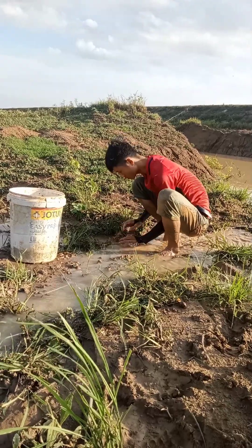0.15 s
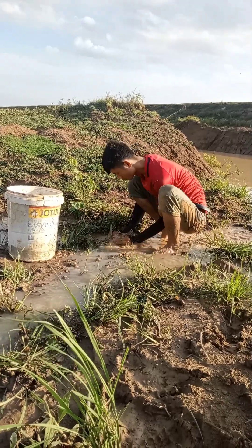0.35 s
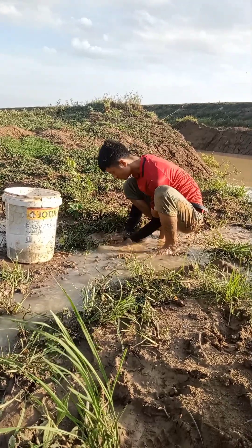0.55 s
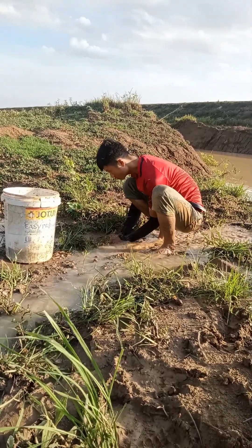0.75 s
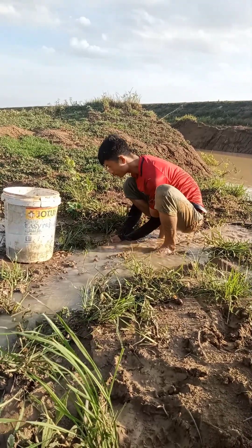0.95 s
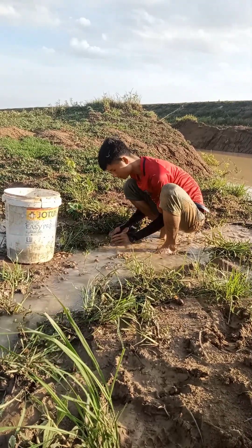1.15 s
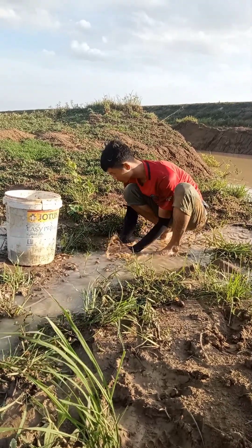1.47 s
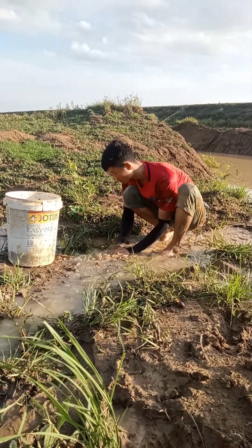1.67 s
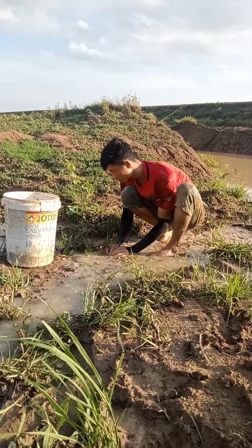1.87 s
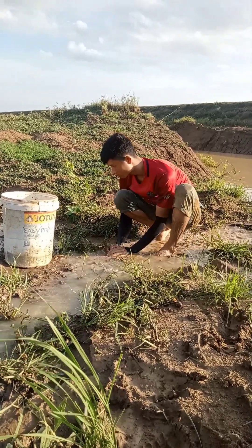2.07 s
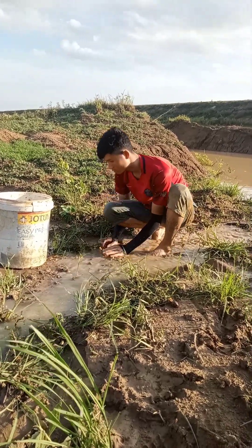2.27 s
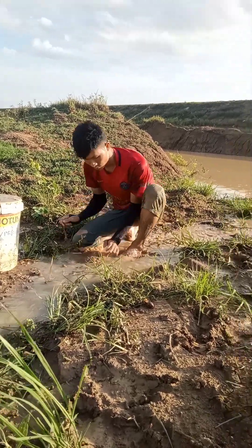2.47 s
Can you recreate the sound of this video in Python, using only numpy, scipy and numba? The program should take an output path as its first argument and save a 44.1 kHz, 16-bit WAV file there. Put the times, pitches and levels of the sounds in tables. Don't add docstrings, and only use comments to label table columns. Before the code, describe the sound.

Hands slosh through a shallow muddy puddle outdoors while wind buffets and thumps the microphone

```python
import sys
import numpy as np
from scipy import signal
from scipy.fft import rfft, irfft
from scipy.io import wavfile
from scipy.ndimage import uniform_filter1d
from numba import njit

SR = 44100
rng = np.random.default_rng(int(sys.argv[2]) if len(sys.argv) > 2 else 0)


def volts(x):
    e = np.asarray(x, float) / 20
    return 10 ** e


def file_out(sig):
    cols = np.atleast_2d(sig).T
    lim = np.clip(cols, -1, 1)
    pcm = np.round(lim * 32767).astype(np.int16)
    wavfile.write(sys.argv[1], SR, pcm)


N = 114660

# time_s, level_db
STIR = [(0, -42), (.15, -41), (.22, -44), (.42, -40.5), (.65, -42), (.92, -40), (1.0, -44), (1.2, -42),
        (1.38, -42), (1.47, -41), (1.75, -43), (2.08, -46), (2.3, -49.5), (2.43, -44.5), (2.52, -38.5),
        (2.6, -41.5)]
# pitch_hz, level_db (per Hz)
WATER = [(250, -2.5), (600, -9.5), (1300, -15.5), (1900, -8.5), (3100, -4), (3900, -8), (4800, -23),
         (6500, -23)]
# pitch_hz, level_db (per Hz)
PORT_SHOULDER = (10700, -23)
# time_s, level_db
BREEZE = [(0, -64), (.17, -50.5), (.21, -31.5), (.36, -40.5), (.44, -33.5), (.47, -48), (.51, -31),
          (1.0, -28), (1.4, -25), (1.8, -25.5), (2.12, -24), (2.2, -31), (2.235, -43), (2.27, -37.5),
          (2.4, -45.5), (2.52, -51), (2.6, -56)]
# start_s, peak_db, pitch_hz, t60_s (time to fade by 60 dB)
GULPS = [(.063, -43.5, 790, 0.022), (0.223, -50, 1043, 0.073), (1.081, -38.5, 494, 0.03),
         (1.375, -42, 527, 0.035), (1.484, -54, 850, 0.096), (1.647, -43, 485, 0.16),
         (1.963, -55, 1040, 0.034), (2.17, -63, 1010, 0.05), (2.498, -45.5, 1050, 0.02),
         (2.519, -63, 620, 0.032), (2.564, -40.5, 836, 0.022), (2.571, -42, 550, 0.018)]
# start_s, peak_db, pitch_hz
TICKS = [(0.2563, -42, 9300), (0.3568, -26.5, 4940), (0.7376, -35, 9250), (0.796, -39, 9500),
         (0.843, -35, 14000), (0.9433, -36, 9400), (1.22, -35.5, 9000), (1.4449, -16.5, 6330),
         (1.508, -35.5, 11400), (1.5745, -31.5, 5300), (1.634, -35, 6500), (1.68, -40, 5060),
         (2.4645, -34, 9100), (0.528, -34, 6430), (1.341, -41, 8050), (2.452, -41, 7000),
         (2.498, -28, 5200), (2.584, -30, 4600),
         (0.0957, -40, 9300), (0.18, -44, 9500), (0.41, -39, 9170), (0.4738, -44, 8170),
               (0.596, -41, 10400), (0.6454, -52, 11000), (0.7592, -44, 9500), (0.8814, -40.5, 9400),
               (0.9204, -46, 5700), (1.033, -41, 7300), (1.0874, -39, 9200), (1.1154, -40, 9450),
               (1.3574, -47, 5500), (1.5953, -45, 9500), (1.6885, -37, 9100), (1.728, -49, 5540),
               (1.7395, -44, 7460), (1.8575, -40, 8630), (1.9694, -42, 6960), (2.0763, -46, 9240),
               (2.113, -45, 6580), (2.169, -43, 7450), (2.2646, -44, 9560), (2.2972, -43, 9200),
               (2.355, -48, 10300)]
# start_s, peak_db, pitch_hz
DROPS = [(0.1428, -28, 2900), (0.3344, -26, 2830), (0.3486, -26.5, 1520), (0.354, -5, 2970),
         (0.416, -36, 3140), (0.4404, -27.5, 1600), (0.5568, -25, 2960), (0.8098, -32.5, 2860),
         (0.9192, -23, 2790), (1.1156, -32, 3430), (1.2107, -31, 3130), (1.4235, -33, 3000),
         (1.4404, -22.5, 2940), (1.4436, -22, 4960), (1.4441, -24.5, 4230), (1.4452, -26.5, 3300),
         (1.4625, -26.5, 2150), (1.472, -36, 3340), (1.478, -34.5, 4200), (1.4614, -41, 3200),
         (1.4984, -35.5, 2870), (1.7823, -32, 2760), (2.2157, -36.5, 2990), (2.4031, -35, 1870),
         (2.4515, -35, 1848), (2.509, -21.5, 2290), (2.5154, -28, 2140), (2.5447, -29, 2460),
         (2.563, -28.5, 2900), (2.581, -25.5, 2080)]
# centre_s, peak_db, pitch_hz
EDDIES = [(0.405, -13, 208), (0.536, -12.5, 149.5), (0.63, -13, 166), (0.696, -8.5, 170.4),
          (0.763, -17, 138), (0.878, -19, 135), (0.9, -10, 136), (0.992, -21, 106),
          (1.072, -26, 160), (1.131, -9, 217), (1.169, -12, 147), (1.227, -9.5, 192),
          (1.353, -17, 152), (1.395, -14, 128), (1.469, -27, 139), (1.506, -16.5, 180),
          (1.558, -12, 173), (1.68, -14, 173), (1.713, -7, 214), (1.728, -7.5, 185),
          (1.778, -14.5, 256), (1.834, -12.5, 148), (1.85, -7.5, 181), (1.913, -12, 182),
          (1.954, -10.5, 173), (2.015, -11, 241), (2.048, -6.5, 210), (2.073, -4, 208),
          (2.09, -8.5, 188), (2.112, -13, 276),
          (0.206, -17.5, 146), (0.232, -20, 135), (0.311, -22, 140), (0.423, -25.5, 168),
                (0.548, -15, 238), (0.567, -19.5, 134), (0.715, -13, 193.0), (0.783, -20.5, 119),
                (0.845, -16, 212), (0.926, -43, 133.0), (0.938, -31, 122.0), (1.057, -16, 130.5),
                (1.106, -28, 120), (1.195, -18, 147), (1.263, -40, 161.0), (1.316, -25, 165),
                (1.384, -16, 147), (1.418, -23, 131), (1.442, -35, 130.0), (1.535, -17.5, 150),
                (1.598, -44, 147), (1.635, -16.5, 187), (1.761, -15.5, 196), (1.799, -18, 160.0),
                (1.814, -25, 143.0), (1.872, -14, 135), (1.887, -13.5, 199), (1.989, -27, 131),
                (2.171, -21.5, 233), (2.271, -25.5, 189),
          (2.039, -10, 320), (2.025, -12.5, 313), (2.065, -14.5, 360), (2.069, -18, 460),
                (2.12, -17, 252), (2.135, -20, 268), (2.19, -36, 170), (2.201, -26, 276),
                (2.215, -29.5, 200), (2.253, -27, 211), (2.354, -32, 188), (2.459, -27.5, 122),
                (0.494, -24, 118), (.52, -22.5, 147), (0.575, -25.5, 266), (0.689, -15.5, 198),
                (0.727, -19.5, 247), (.794, -21.5, 201), (.864, -17, 303), (1.068, -21, 352),
                (1.156, -15.5, 290), (1.245, -14, 158), (1.342, -21.5, 306), (1.566, -18, 298),
                (1.843, -17.5, 241), (2.043, -23.5, 640), (2.071, -19.5, 720), (2.016, -27, 560),
                (1.726, -20.5, 520)]
# centre_s, level_db, half_length_s, brightness_db (per octave)
SLAPS = [
    (0.266, -42.5, 0.014, 1),
    (0.351, -33, .012, -0.5),
    (.358, -29, 0.0039, 2.5),
    (0.84, -38, 0.0008, 13),
    (1.442, -35.5, 0.0071, 3),
    (1.446, -37, 0.0011, 8.5),
    (1.46, -40, 0.02, 1),
    (2.515, -43, 0.022, 4.5),
    (2.57, -35, 0.0023, -2),
    (2.59, -47, 0.016, 2),
]

PORT_HZ, PORT_OCTAVES, PORT_DB = 9380, .1, 4.5
HISS_DB, FIZZ_DB, BUBBLE_DB, CRACKLE_DB = -8.5, -3.5, -9.5, -19
BREEZE_LOW_HZ, BREEZE_TOP_HZ = 66.5, 218.4
TICK_T60_S, SPRAY_S, SPRAY_DB = .005, .0018, -7
DROP_T60_S, DROP_RISE = .011, .03
EDDY_TURNS, EDDY_BEND = .59, .087
SWIRL_TOP, SWIRL_FLOOR, SWIRL_DB = 1.984, 1.43, -11.5


def curve(table):
    time_s, value = np.array(table, float).T
    return np.interp(np.arange(N) / SR, time_s, value)


def columns(table):
    return np.array(table, float).T.copy()


def unit(x):
    return x / np.sqrt(np.mean(x ** 2))


def drift(rate):
    hold = int(SR / rate)
    steps = np.repeat(rng.standard_normal(N // hold + 1), hold)
    return 1.9 * uniform_filter1d(uniform_filter1d(steps, hold), hold)[:N]


def water_db(hz):
    point_hz, point_db = np.vstack([WATER, PORT_SHOULDER]).astype(float).T
    port_db = PORT_DB * np.exp(-.5 * (np.log2(hz / PORT_HZ) / PORT_OCTAVES) ** 2)
    top_db = -19 * np.clip(np.log2(hz / point_hz[-1]), 0, .42)
    return np.interp(np.log2(hz), np.log2(point_hz), point_db) + port_db + top_db


def coloured(tilt_db, x=None):
    hz = np.maximum(np.arange(N // 2 + 1) * SR / N, 30)
    x = rng.standard_normal(N) if x is None else x
    return unit(irfft(rfft(x) * volts(water_db(hz) + tilt_db * np.log2(hz / 3000)), N))


@njit
def rings(start, size, hz, t60, rise, attack):
    y = np.zeros(N)
    for e in range(len(start)):
        length, first, phase = t60[e] * SR, int(start[e] * SR), 0.
        for i in range(max(0, min(int(length), N - first))):
            phase += 2 * np.pi * hz[e] * (1 + rise * 2 * i / length) / SR
            swell = 1 - np.exp(-i * hz[e] / SR / attack)
            y[first + i] += size[e] * 1000. ** (-i / length) * swell * np.sin(phase)
    return y


@njit
def moving_filter(x, hz, k):
    y, b, l = np.empty((3, len(x))), 0., 0.
    for i in range(len(x)):
        g = np.tan(np.pi * hz[i] / SR)
        v = (b + g * (x[i] - l)) / (1 + g * (g + k))
        low = l + g * v
        y[0, i], y[1, i], y[2, i] = low, k * v, x[i] - k * v - low
        b, l = 2 * v - b, 2 * low - l
    return y


def dull(x, hz):
    for _ in range(3):
        x = moving_filter(x, hz, 1.55)[0]
    for _ in range(2):
        x = moving_filter(x, np.full(N, 1. * BREEZE_LOW_HZ), 1.09)[2]
    return x * np.sqrt(200 / hz)


def grains(count, cycles, scatter_db, rise, attack):
    when, pitch, luck, length = rng.random((count, 4)).T
    start, hz = when * N / SR, 400 * 38 ** pitch
    bunch_db = 1.48 * drift(60)[(start * SR).astype(int)]
    loud_db = -scatter_db * np.log(1 - .98 * luck)
    size = volts(water_db(hz) + 0.8 * np.log2(hz / 3000) + bunch_db + loud_db) * np.sqrt(hz)
    return unit(rings(start, size, hz, cycles * (.5 + length) / hz, rise, attack))


def crackle(count, scatter_db):
    when, luck, side = rng.random((count, 3)).T
    clicks = np.zeros(N)
    clicks[(when * N).astype(int)] = np.sign(side - .5) * volts(-scatter_db * np.log(1 - .97 * luck))
    return coloured(2, clicks)


def slosh():
    hiss = volts(HISS_DB + 1.2 * drift(70)) * coloured(0.)
    fizz = volts(FIZZ_DB) * grains(count=9000, cycles=19.5, scatter_db=3.5, rise=0.0068, attack=4.1)
    bubbles = volts(BUBBLE_DB) * grains(count=3600, cycles=100, scatter_db=6.0, rise=0.041, attack=3.9)
    pops = volts(CRACKLE_DB) * crackle(count=250, scatter_db=2.0)
    return volts(curve(STIR)) * (hiss + fizz + bubbles + pops)


def breeze():
    level_db = curve(BREEZE)
    top_hz = BREEZE_TOP_HZ * 2 ** (.03 * (level_db + 32))
    rumble = unit(dull(rng.standard_normal(N), top_hz))
    return volts(level_db + 3 * drift(45.57)) * rumble


def gulps():
    start, peak_db, hz, t60 = columns(GULPS)
    return rings(start, volts(peak_db + 17.5), hz, t60, .12, 0.87)


def ticks():
    start, peak_db, hz = columns(np.array(TICKS))
    ring = rings(start, volts(peak_db), hz, np.full(len(start), TICK_T60_S), DROP_RISE, 0.79)
    t, puffs = np.arange(N) / SR, np.zeros(N)
    for s, db in zip(start, peak_db):
        puffs += volts(db + SPRAY_DB) * (t > s) * np.exp(-np.abs(t - s) / SPRAY_S)
    return ring + puffs * coloured(3.)


def drops():
    start, peak_db, hz = columns(DROPS)
    t60 = np.full(len(start), DROP_T60_S)
    main = rings(start + .0005, volts(peak_db + 7.0), hz, t60, DROP_RISE, 2.46)
    twin = rings(start, volts(peak_db - 8.0), 1.11 * hz, 1.7 * t60, DROP_RISE, 1.3)
    return main + twin


def with_wake(x):
    return x + .5 * uniform_filter1d(uniform_filter1d(x, size=1300), size=1300)


def eddies():
    t = np.arange(N) / SR
    thumps, force, pitch = np.zeros(N), np.full(N, 1e-5), np.zeros(N)
    for s, db, hz in np.array(EDDIES):
        turn, bend = rng.random(2)
        d = t - s
        shape = volts(db) * np.exp(-.5 * (d * hz / EDDY_TURNS) ** 2)
        swing = 2 * np.pi * (hz * d + turn) + EDDY_BEND * (2 * bend - 1) * (hz * d) ** 2
        thumps += shape * np.cos(swing)
        force += shape
        pitch += shape * hz * 2 ** (.05 * (db + 16.5))
    force, pitch = with_wake(force), with_wake(pitch)
    top_hz = np.clip(SWIRL_TOP * pitch / force, 100, 900)
    noise = dull(rng.standard_normal(N), top_hz)
    swirl = unit(moving_filter(noise, SWIRL_FLOOR * top_hz / SWIRL_TOP, 0.48)[2])
    return thumps + volts(SWIRL_DB) * force * swirl


def slaps():
    t, out = np.arange(N) / SR, np.zeros(N)
    for centre, db, half, tilt_db in SLAPS:
        out += volts(db) * np.exp(-.5 * ((t - centre) / half) ** 2) * coloured(tilt_db)
    return out


def scene():
    wind = eddies() + breeze()
    water = slosh() + gulps() + ticks() + drops() + slaps()
    return (wind + water)[None]


def band_limit(x):
    return signal.sosfilt(signal.butter(12, 16660, fs=SR, output="sos"), x)


def record(dry):
    bass_cut = signal.butter(3, 42.6, "high", fs=SR, output="sos")
    treble_cut = signal.ellip(10, .5, 60, 15450, fs=SR, output="sos")
    mix = signal.sosfilt(np.vstack([bass_cut, treble_cut]), dry)
    return band_limit(mix)


dry = scene()
out = record(dry)
file_out(out)
```